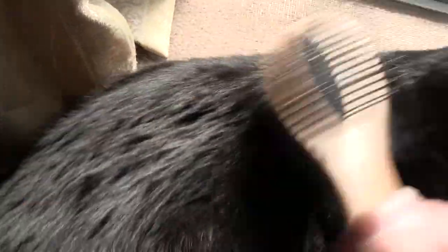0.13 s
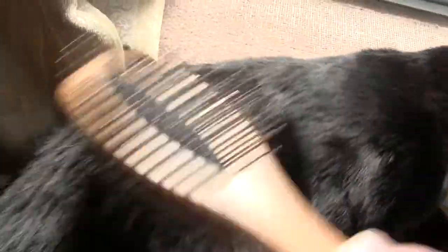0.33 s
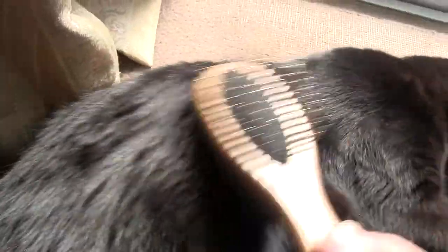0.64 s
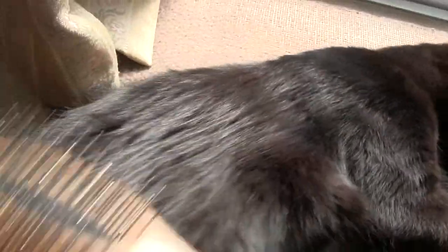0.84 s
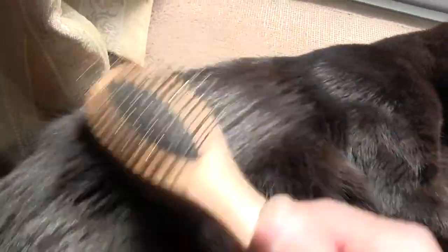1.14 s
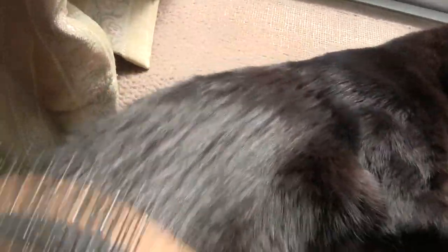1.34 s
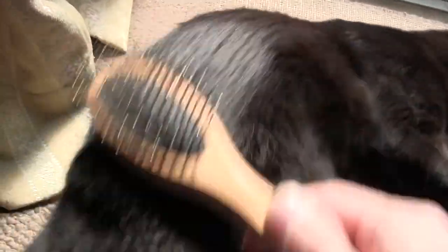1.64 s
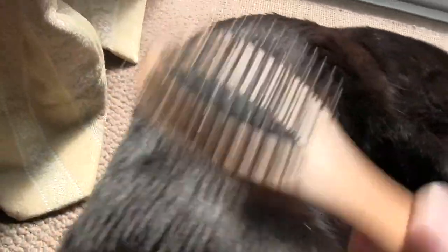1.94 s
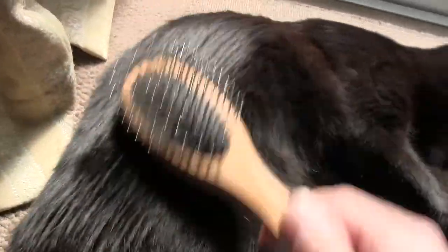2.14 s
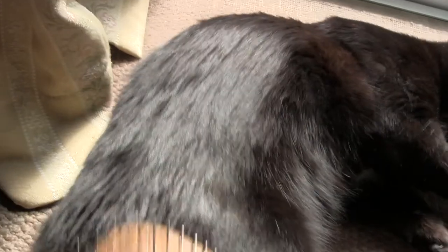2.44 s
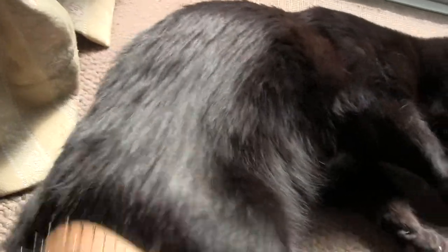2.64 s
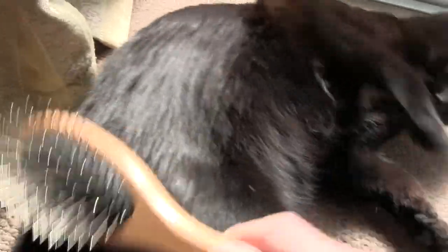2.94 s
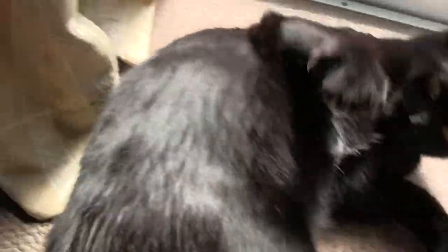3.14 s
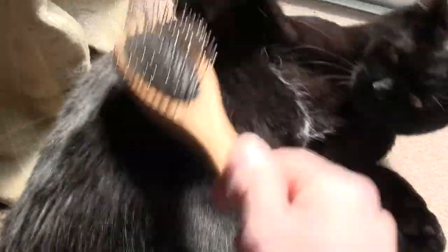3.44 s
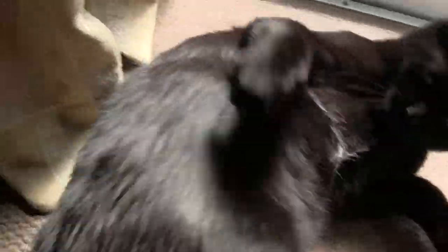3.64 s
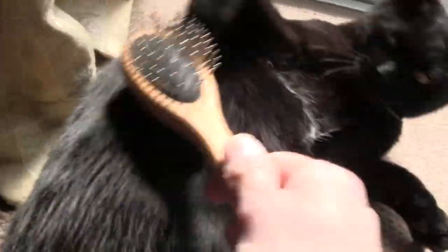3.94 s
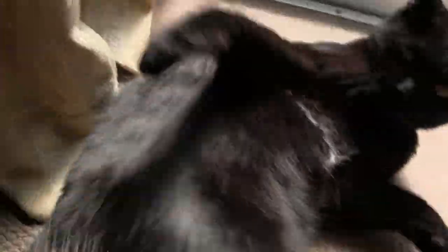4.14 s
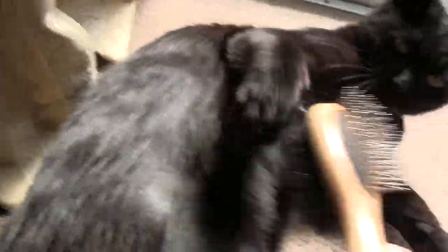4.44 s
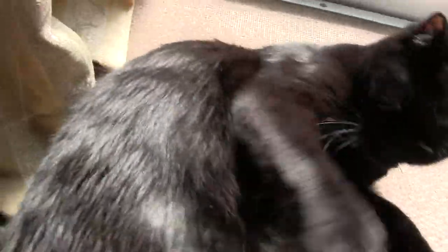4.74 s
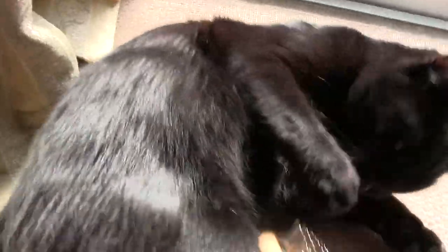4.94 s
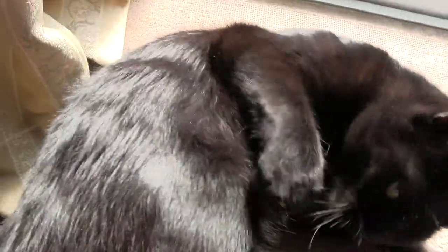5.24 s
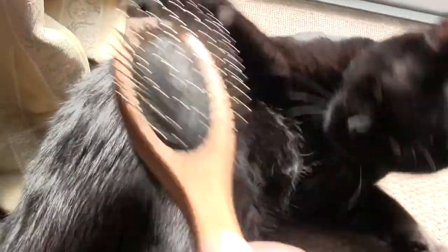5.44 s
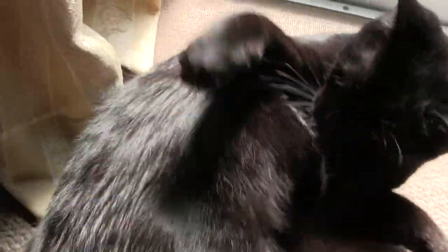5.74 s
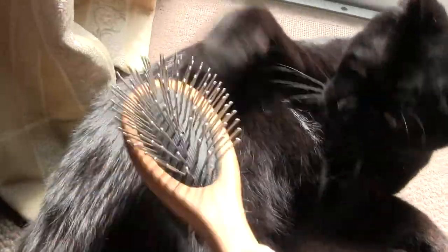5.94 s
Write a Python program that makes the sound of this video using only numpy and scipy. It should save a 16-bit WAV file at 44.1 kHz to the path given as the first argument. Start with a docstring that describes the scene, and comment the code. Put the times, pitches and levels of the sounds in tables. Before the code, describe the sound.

Heard from close by in a quiet furnished room, a brush swishes again and again through a cat's coat, setting off small sharp sparks of static. A loud snap with a wooden knock comes early, and the loudest, a quick cluster, just before the middle. The brushing carries on with a flurry of high crackles, muffled bumps from hand and paws and a few tiny pings, over faint steady room noise.

```python
"""On a carpet in a quiet furnished room, a wooden brush is drawn again and again through a cat's coat.
Friction between bristles and hair makes a hiss and charges the fur, which discharges in crackles and snaps.
A low handle ring and a bright treble tip follow each snap. Wood knocks, hand and paws thud softly, and
a few thin pings sound. All is heard from close by, over a room tone; the room answers the loudest snaps."""
import sys
import numpy as np
from scipy import signal
from scipy.fft import rfft, irfft
from scipy.io import wavfile
from scipy.ndimage import uniform_filter1d

SR = 44100
rng = np.random.default_rng(int(sys.argv[2]) if len(sys.argv) > 2 else 0)


def generate_wav(signal):
    """Clip the signal to [-1, 1] and save it as 16-bit WAV at the path in sys.argv[1]."""
    frames = np.transpose(np.atleast_2d(signal))
    scaled = np.clip(frames, -1, 1) * 32767
    pcm = np.round(scaled).astype(np.int16)
    wavfile.write(sys.argv[1], SR, pcm)


N = 268721

# room tone, relative spectral density: frequency_hz, level_db
TONE_SPECTRUM = [(15, -40), (25, -18), (64, -21), (108, -6), (400, -5), (470, -8), (630, -2), (900, -5),
                 (1200, -8), (3500, -12), (5500, -18), (16000, -27)]
# room tone, likeness of left and right: frequency_hz, correlation
TONE_CORRELATION = [(60, 0.98), (130, 0.81), (300, 0.23), (640, 0.12), (3000, 0.74), (7000, 0.61),
                    (15000, 0.032)]
# reverberation by band: centre_hz, t60_s, level_db, correlation
REVERB_BANDS = [(138, 0.83, -27.5, 1), (230, 1, -24, 0.96), (450, 0.58, -25, 0.87),
                (940, 0.54, -22.5, 0.94), (2130, 0.51, -27, 0.9), (4140, 0.23, -20, 0.8),
                (7740, 0.096, -19, 1)]
# soft contacts of hand, paw and brush: start_s, level_db, pitch_hz, relative_floor_thump_db
SOFT_CONTACTS = [(.169, -35, 218, -13), (0.275, -22.5, 136, 2.5), (0.323, -32, 201, -7),
                 (0.395, -36.5, 252, -24.5), (0.814, -28.5, 516, -3), (.8567, -34.5, 483, 0),
                 (1.078, -25, 178, -17), (1.118, -37, 480, -15), (2.709, -24.5, 143, -22),
                 (4.253, -26, 176, -12), (4.266, -25.5, 147, -8), (4.281, -36, 149, -15),
                 (4.63, -33, 455, -22), (4.657, -31.5, 437, -20), (4.683, -22, 446, -31),
                 (4.797, -35.5, 695, -20), (4.864, -36, 437, -16), (4.925, -30, 500, -18),
                 (4.956, -28.5, 502, -20), (5.069, -33, 404, -9), (5.135, -34.5, 666, 0.5),
                 (5.566, -39, 162, -10), (5.245, -36.5, 476, -18), (5.96, -37, 520, -1),
                 (6.017, -32.5, 366, -2)]
# wood striking something hard: start_s, level_db, tilt_db_per_octave, room_send_db
WOOD_KNOCKS = [(.161, -30, -6.5, -6), (0.2731, -16.5, -2.5, -23), (1.328, -33, 4.5, -6.5),
               (1.3718, -9.5, 1, 0.5), (2.696, -19.5, -3, -9), (2.7086, -8, 0.5, 2.5)]
# modes of the knocked wood: pitch_hz, level_db, t60_s
WOOD_MODES = [(206.5, -12.5, 0.056), (349, -12, 0.054), (675, 2, 0.018), (863, -9.5, 0.045),
              (1205, -3, 0.017), (1985, -14.5, 0.043)]
# short pings, as of plucked pins: start_s, level_db, pitch_hz
PIN_PINGS = [(4.926, -32, 990), (5.486, -33.5, 7770), (5.508, -38, 7460), (5.51, -41, 990),
             (5.536, -35, 1520), (5.54, -36.5, 930)]
# brush strokes (rise, pull, lift, fade): lift_s, pull_s, rise_s, fade_s, hiss_db, swell_db,
# relative_fizz_db, fizz_rise_db, relative_rumble_db
BRUSH_STROKES = [(0.283, 0.16, 0.029, 0.027, -49, 12, -5.5, 7, -4.5),
                 (.81, .11, 0.074, 0.05, -38, 0.5, -7, -6, -8.5),
                 (1.08, 0.041, 0.034, 0.046, -46.5, -3.5, -29, 6, -6),
                 (1.287, .125, 0.088, .05, -40, -0.5, -5.5, 7, -6),
                 (1.74, 0.12, 0.15, 0.038, -43, 1, -9.5, 14, -6),
                 (1.824, 0.055, 0.029, 0.045, -41, -1, -3, -1, -15),
                 (2.39, .11, 0.15, .03, -41, -4.5, -3, 5.5, -7.5),
                 (2.696, 0.014, 0.043, 0.014, -39.5, 9.5, -2.5, -7, -1),
                 (3.118, 0.043, 0.069, .025, -44.5, -2.5, -1.5, 6, -7),
                 (3.647, 0.073, 0.062, 0.021, -38.5, -2, -6.5, 7, -9),
                 (4.17, 0.091, 0.069, .03, -41.5, -4, -5.5, 13, -10),
                 (4.689, 0.096, 0.035, 0.014, -41, 3, -7, 7, -2.5),
                 (4.76, 0.057, .01, 0.065, -58, -4, 9, 0, -16),
                 (4.96, 0.032, 0.027, .03, -46, 1, -4.5, 4, -8),
                 (5.089, 0.071, 0.029, 0.035, -42.5, 4.5, -2, -11, -3),
                 (5.147, .03, 0.032, 0.016, -43, -0.5, 1, 10, -5.5),
                 (5.52, 0.034, 0.012, 0.038, -48.5, -1, -3, -8, -12),
                 (5.549, 0.013, .006, .012, -45, 0, -24, 0, -9),
                 (5.745, 0.079, 0.039, 0.044, -45.5, -3, -1, 8.5, -18),
                 (6.07, 0.092, 0.036, 0.046, -48.5, -11, -17, -1, 5.5)]
# bands of bristle hiss, treble fizz and pressure rumble: centre_hz, width_hz, level_db
HISS_BANDS = [(2060, 1370, -2.5), (3290, 3100, -3.5)]
FIZZ_BANDS = [(6080, 5350, 15.5), (10100, 3900, 3.5)]
RUMBLE_BANDS = [(490, 250, 5.5), (1110, 1260, 4.5)]
# the clearest static discharges: time_s, level_db, pitch_hz, left_minus_right_db
STATIC_SNAPS = [(.1635, -24.5, 2900, -1.5), (.2741, -15.5, 2880, -3), (.2766, -23, 2900, 4),
                (.8145, -13.5, 3180, -3.5), (.858, -26, 1900, 0), (.9493, -31, 1800, -1),
                (.9684, -34, 3000, 0), (1.1175, -24.5, 1700, -3), (1.3295, -26.5, 2720, -1),
                (1.3723, -0.5, 1840, -4), (1.3738, -21, 3980, 19), (1.8754, -31, 7800, 1.6),
                (2.4361, -29, 8500, .4), (2.4398, -40, 7200, -.6), (2.4741, -34, 6560, 3),
                (2.5879, -31, 2285, -3), (2.6863, -14, 1900, -1), (2.6888, -16, 2600, -7),
                (2.6947, -10, 3300, -5), (2.7037, -16, 2300, -9), (2.707, -8, 2090, -1.6),
                (2.7085, 4.5, 1750, -3), (2.7128, -11, 2300, 0), (2.7137, -14.5, 6500, -8),
                (2.768, -40, 7000, 0), (2.837, -38, 8950, 0), (2.9103, -28.5, 3480, -4),
                (3.436, -16, 4200, 2), (3.4395, -26.5, 3000, 1.6), (3.545, -32, 9000, 0),
                (3.6808, -31.5, 7550, -2), (4.1786, -29, 7400, 0), (4.183, -30, 6840, 0),
                (4.2447, -38, 6600, -.6), (4.2732, -33.5, 6200, 2), (4.6168, -25, 6550, 0),
                (4.648, -22, 6600, 6), (4.6515, -22, 6860, 4), (4.6574, -11, 5700, -1),
                (4.6756, -29, 5900, -3), (4.68, -28, 4800, 5), (4.6846, -11.5, 6400, -2),
                (4.688, -15, 5900, 1), (4.775, -28.5, 3900, 0), (4.7977, -26.5, 2440, -.8),
                (4.8662, -29, 2500, 1.5), (4.9254, -17.5, 3340, 2), (4.9634, -32, 3230, -2),
                (5.0939, -21.5, 2120, -2), (5.1128, -18, 2980, 0), (5.142, -26.5, 6160, .4),
                (5.1457, -28, 5700, .5), (5.2454, -23.5, 3300, -1.4), (5.4812, -35, 8900, -1),
                (5.485, -24, 4340, 3), (5.4876, -30, 7260, -2), (5.5055, -23, 5160, .4),
                (5.5094, -26, 6500, 2), (5.7777, -29, 7600, -1), (5.7905, -31.5, 7600, 3),
                (5.8525, -34, 5360, -0.5), (5.9178, -36, 6700, .8), (6.0188, -26.5, 2680, -5)]
# short resonances after each snap, a low handle ring and a bright treble tip: pitch_hz, level_db, t60_s
SNAP_RESONANCES = [(433, -0.5, 0.064), (676, 2.5, 0.016), (1120, -63, 0.008), (3150, 4, 0.0049),
                   (7200, -14, 0.0074)]


def undb(db):
    """Amplitude grows tenfold for every 20 dB."""
    return 10 ** (np.asarray(db) / 20)


def unit(x):
    """Normalisation to an rms of 1."""
    return x / np.sqrt(np.mean(x ** 2))


def band(x, hz, width_hz):
    """Two-pole resonance with unit gain at its centre."""
    return signal.lfilter(*signal.iirpeak(min(hz, .45 * SR), hz / width_hz, fs=SR), x)


def drift(rate_hz):
    """Random modulation: held values, smoothed twice by a moving average."""
    hold = int(SR / rate_hz)
    steps = np.repeat(rng.standard_normal(N // hold + 1), hold)
    return 1.4 * uniform_filter1d(uniform_filter1d(steps, hold), hold)[:N]


def stereo_noise(correlation, size):
    """Partial coherence: left and right share one noise and take another in opposite phase."""
    mid, side = rng.standard_normal((2, size))
    return np.sqrt((1 + correlation) / 2) * mid + np.sqrt((1 - correlation) / 2) * np.array([side, -side])


def add(track, start_s, piece):
    """Superposition: a piece adds to the track from its start time."""
    i = int(start_s * SR)
    track[..., i:i + piece.shape[-1]] += piece[..., :N - i]


def ring(hz, t60_s, size):
    """Damped free vibration: a struck mode loses 60 dB in t60_s."""
    t = np.arange(size) / SR
    return np.sin(2 * np.pi * hz * t) * np.exp(-np.log(1000) * t / max(t60_s, .002))


def room_tone(level_db=-48.5, swell_db=.3, flicker_db=.5):
    """Broadband background noise, whose octave bands swell together and waver separately."""
    hz = np.maximum(np.fft.rfftfreq(N, 1 / SR), 1)
    tone, coherence = np.array(TONE_SPECTRUM), np.array(TONE_CORRELATION)
    shape = undb(np.interp(np.log(hz), np.log(tone[:, 0]), tone[:, 1]))
    alike = np.interp(np.log(hz), np.log(coherence[:, 0]), coherence[:, 1])
    mid, side = rfft(rng.standard_normal((2, N)))
    spectrum = shape * (np.sqrt(1 + alike) * mid + np.sqrt(1 - alike) * np.array([side, -side]))
    out, swell = 0, swell_db * drift(.48)
    for octave in range(4, 15):
        share = np.clip(1 - np.abs(np.log2(hz) - octave), 0, 1)
        out = out + irfft(spectrum * share, N) * undb(swell + flicker_db * drift(5.12))
    return unit(out) * undb(level_db)


def reverberation(x, gap_s=.0039):
    """Dense reflections follow a short gap and decay exponentially, the treble first."""
    t = np.arange(SR) / SR
    onset = np.clip(t / gap_s - 1, 0, 1)
    response = 0
    for hz, t60, db, correlation in REVERB_BANDS:
        noise = band(band(stereo_noise(correlation, SR), hz, hz), hz, hz)
        decay = noise * np.exp(-np.log(1000) * t / t60)
        response = response + undb(db) * decay / np.sqrt(np.sum(decay ** 2) / 2) * onset
    return signal.fftconvolve(x.mean(axis=0)[None], response, axes=1)[:, :N]


def impacts(lag_cycles=.55, thump_hz=217, thump_t60_s=.068, soft_send_db=-12.5):
    """Impacts excite damped modes: wood knocks, soft thuds, floor thumps. Gives direct sound and room send."""
    modes = []
    for s, db, tilt, send_db in WOOD_KNOCKS:
        for hz, mode_db, t60 in WOOD_MODES:
            hardness_db = tilt * np.log2(hz / 675)  # harder blows favour higher modes
            modes.append((s + lag_cycles / hz, db + mode_db + hardness_db, hz, t60, send_db))
    for s, db, hz, thump_db in SOFT_CONTACTS:
        t60 = .037 * (500 / hz) ** .61  # higher thuds die sooner
        modes.append((s, db, hz, t60, soft_send_db))
        modes.append((s + lag_cycles / thump_hz, db + thump_db, thump_hz, thump_t60_s, soft_send_db))
    direct, room_send = np.zeros((2, N))
    t = np.arange(8192) / SR
    for s, db, hz, t60, send_db in modes:
        rounded_onset = 1 - np.exp(-6 * hz * t)
        vibration = undb(db) * ring(hz, t60, len(t)) * rounded_onset
        add(direct, s, vibration)
        add(room_send, s, undb(send_db) * vibration)
    return direct, room_send


def pings(t60_s=.03, roughness=.76):
    """Amplitude modulation roughens each short ring, as of a pin dragging along hair."""
    out = np.zeros(N)
    for s, db, hz in PIN_PINGS:
        add(out, s, undb(db) * ring(hz, t60_s, 4096))
    return out * (1 + roughness * drift(600))


def stroke_envelopes(touch_db=-14.5, lift_db=-19.5, rumble_rise_db=3):
    """Friction noise follows contact: gains of hiss, fizz and rumble through touch, pull and lift."""
    gains = np.full((3, N), 1e-6)
    for lift_s, pull_s, rise_s, fade_s, db, swell_db, fizz_db, fizz_rise_db, rumble_db in BRUSH_STROKES:
        corners_s = lift_s + np.array([-pull_s - rise_s, -pull_s, 0, fade_s])
        touch_s = corners_s[0]
        t = np.arange(touch_s, corners_s[-1], 1 / SR)
        hiss_db = db + np.interp(t, corners_s, [touch_db, 0, swell_db, swell_db + lift_db])
        along = np.minimum((t - touch_s) / (lift_s - touch_s), 1) - .5  # -.5 at touch, +.5 at lift
        colour_db = np.array([0 * t, fizz_db + fizz_rise_db * along, rumble_db + rumble_rise_db * along])
        add(gains, touch_s, undb(hiss_db + colour_db))
    return gains


def bristle_friction(gains, scatter_db=2.5, flicker_db=1.2):
    """Stick-slip friction: hairs leave the bristles in thousands of uneven ticks that merge into noise."""
    ticks = stereo_noise(correlation=.92, size=N)
    ticks *= undb(scatter_db * np.minimum(rng.exponential(size=N), 5))
    out = 0
    for bands, gain in zip((HISS_BANDS, FIZZ_BANDS, RUMBLE_BANDS), gains):
        noise = sum(undb(db) * band(band(ticks, hz, width), hz, 2 * width) for hz, width, db in bands)
        out = out + unit(noise) * gain * undb(flicker_db * drift(40))
    return out


def stray_crackles(hiss_gain, per_s=30, above_hiss_db=4.5, scatter_db=3, centre_hz=4900):
    """Frictional charging: lists small discharges at random times, their strength following the stroke."""
    when, strength, pitch, pan = rng.random((int(per_s * N / SR), 4)).T
    time_s = .01 + when * (N / SR - .02)
    hiss_db = 20 * np.log10(hiss_gain[(time_s * SR).astype(int)])
    level_db = hiss_db + above_hiss_db - scatter_db * np.log(1 - strength)
    return list(zip(time_s, level_db, centre_hz * 2 ** (pitch - .5), 4 * (pan - .5)))


def static_discharges(events, spark_s=.00011, edge_db=-10, edge_hz=8000, edge_s=.00005, fuzz_s=.001):
    """A spark radiates a brief compression and rarefaction; a noisy tail and short resonances follow."""
    resonances = [undb(db) * ring(hz, t60, 4096) for hz, db, t60 in SNAP_RESONANCES]
    after_ring = undb(-14.5) * np.mean(resonances, axis=0)
    t = np.arange(-64, 448) / SR
    edge = -undb(edge_db) * np.sin(2 * np.pi * edge_hz * t) * np.exp(-(t / edge_s) ** 2 / 2)
    out = np.zeros((2, N))
    for s, db, hz, pan_db in events:
        width_s = spark_s * np.sqrt(3000 / hz)
        pulse = -np.sin(2 * np.pi * hz * t) * np.exp(-(t / width_s) ** 2 / 2)
        noise = unit(band(rng.standard_normal(len(t)), hz, hz))
        fuzz = (t > 0) * np.exp(-np.abs(t) / fuzz_s) * noise
        fuzz_db = -14 + .27 * db + 2.5 * np.log2(hz / 3000)  # strong or high snaps are fuzzier
        sides = undb(db + np.array([[pan_db], [-pan_db]]) / 2)
        add(out, s + t[0], sides * (pulse + edge + undb(fuzz_db) * fuzz))
        add(out, s, sides * after_ring)
    return out


def scene(passband_hz=(310, 11200), low_cut_hz=80):
    """Direct and reverberant sound superpose, lose their extreme bass and treble, and join the room tone."""
    gains = stroke_envelopes()
    fur = bristle_friction(gains)
    fur += static_discharges(STATIC_SNAPS + stray_crackles(gains[0]))
    fur += pings()
    contacts, room_send = impacts()
    mix = fur + contacts + reverberation(fur + room_send)
    mix = signal.sosfilt(signal.butter(1, passband_hz, "bandpass", fs=SR, output="sos"), mix)
    mix = signal.sosfilt(signal.butter(4, low_cut_hz, "highpass", fs=SR, output="sos"), mix)
    return mix + room_tone()


def record(dry, top_hz=15900, dc_offset=-.0017):
    """Clipping at full scale, then steep band-limiting and a slight constant offset."""
    lowpass = signal.ellip(12, .2, 90, top_hz, fs=SR, output="sos")
    return signal.sosfilt(lowpass, np.clip(dry, -1, 1)) + dc_offset


dry = scene()
out = record(dry)
generate_wav(out)
```